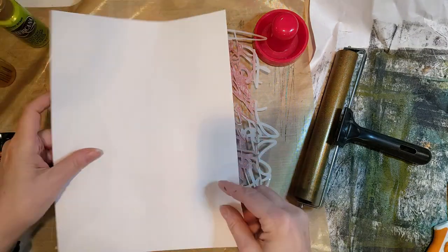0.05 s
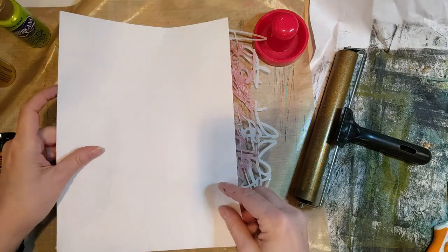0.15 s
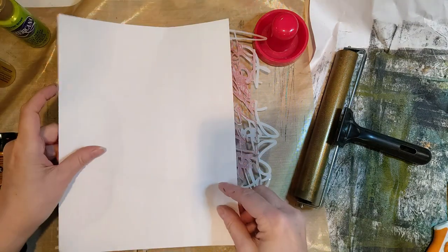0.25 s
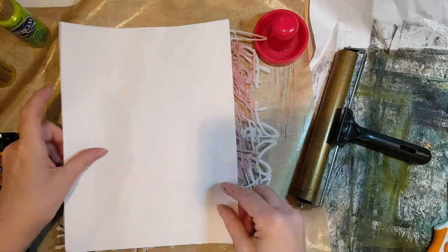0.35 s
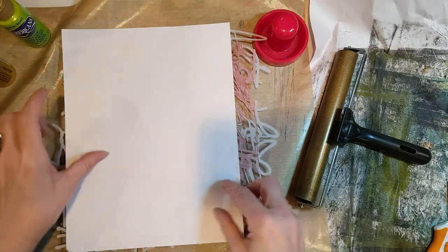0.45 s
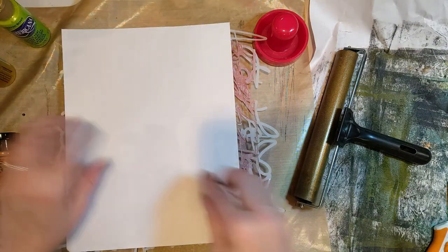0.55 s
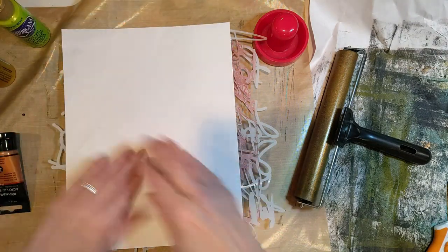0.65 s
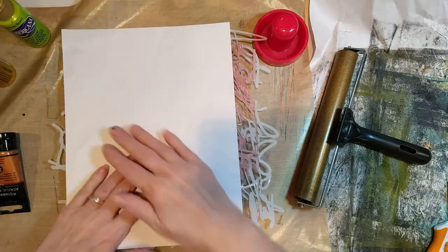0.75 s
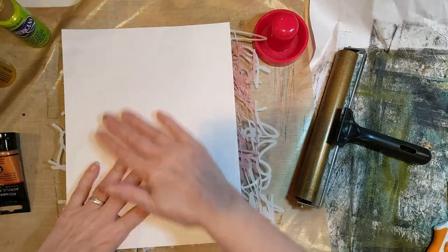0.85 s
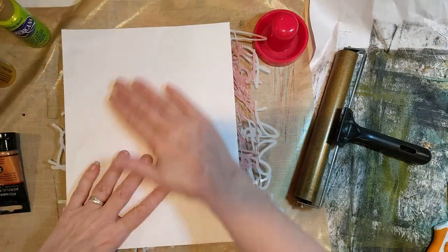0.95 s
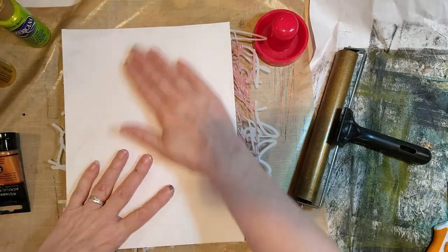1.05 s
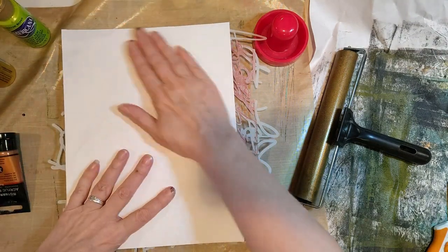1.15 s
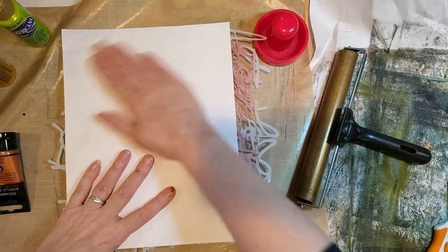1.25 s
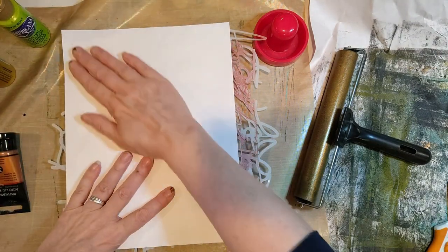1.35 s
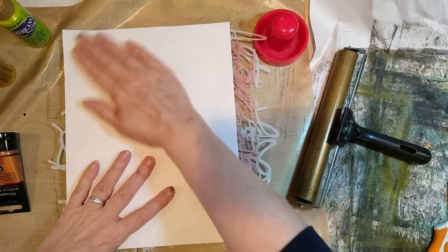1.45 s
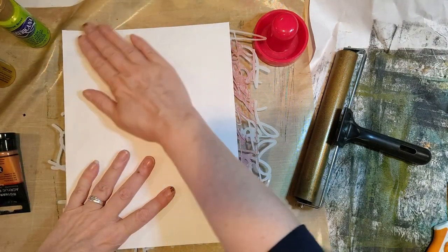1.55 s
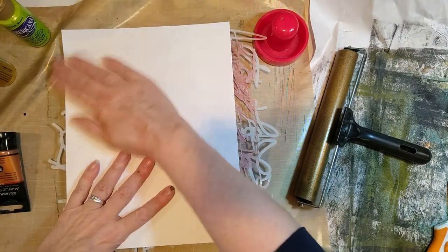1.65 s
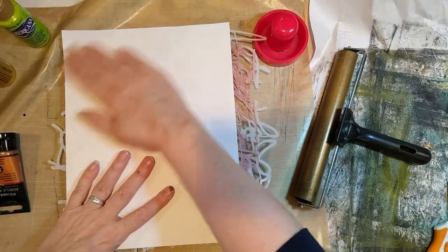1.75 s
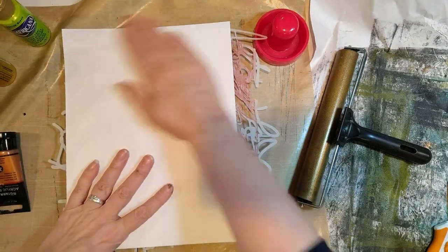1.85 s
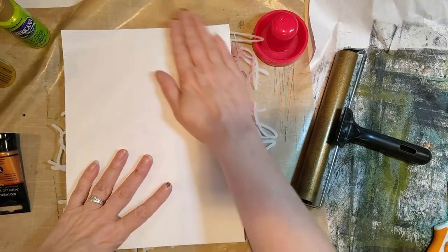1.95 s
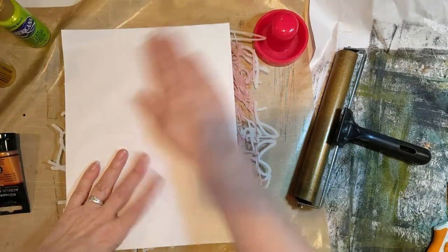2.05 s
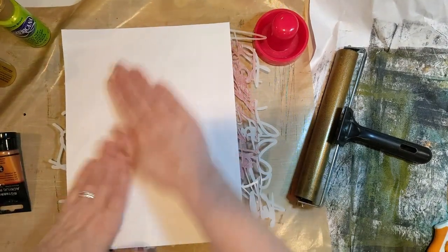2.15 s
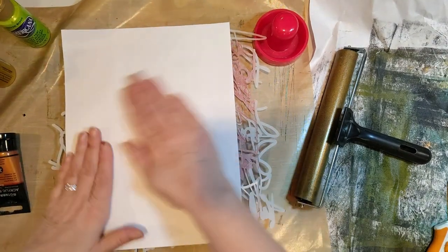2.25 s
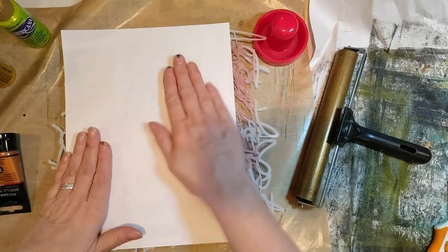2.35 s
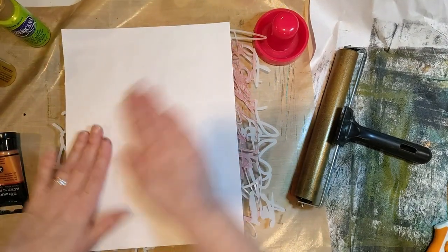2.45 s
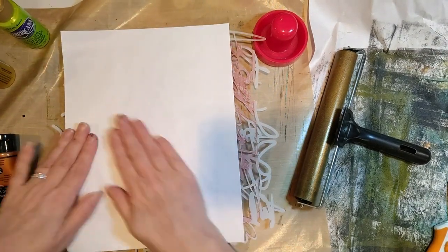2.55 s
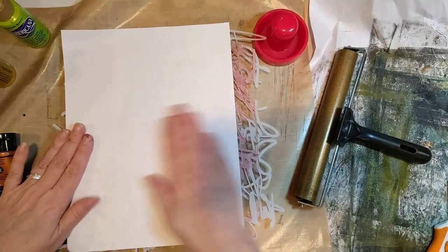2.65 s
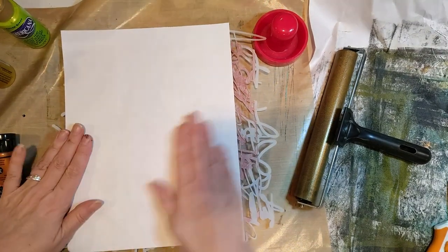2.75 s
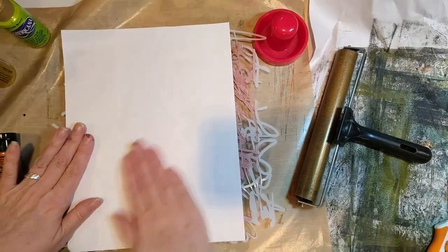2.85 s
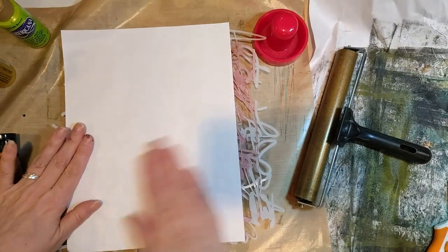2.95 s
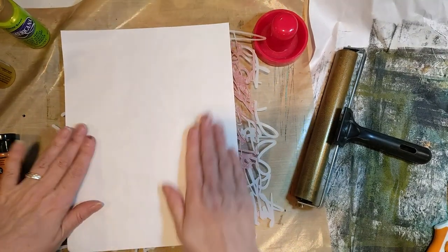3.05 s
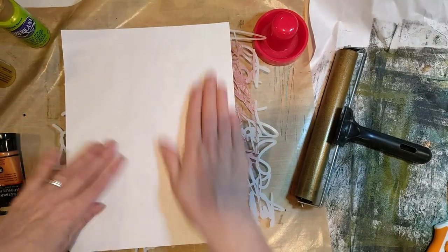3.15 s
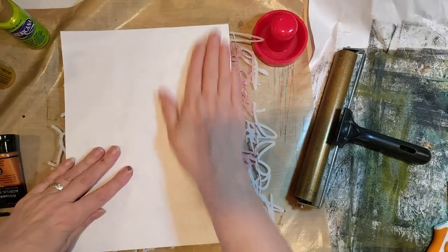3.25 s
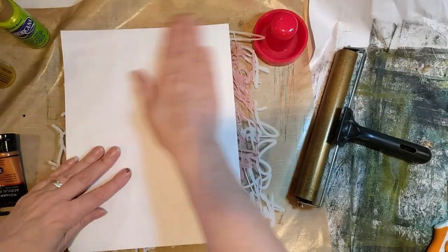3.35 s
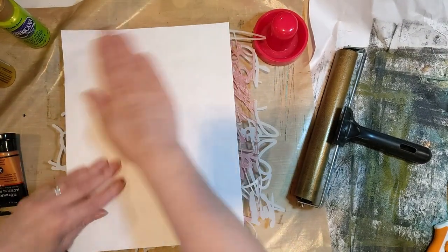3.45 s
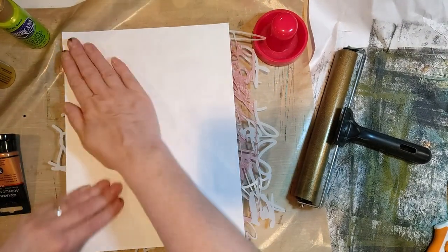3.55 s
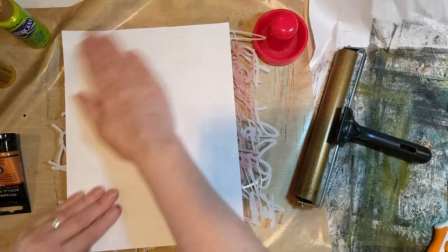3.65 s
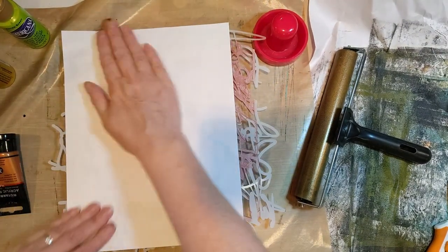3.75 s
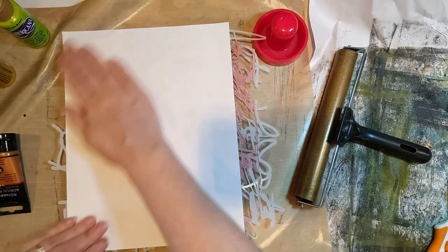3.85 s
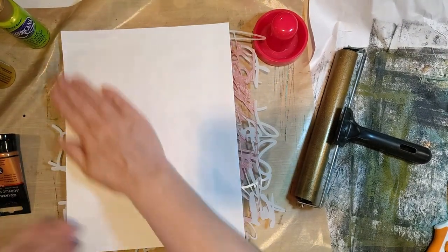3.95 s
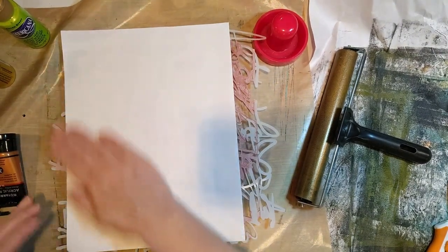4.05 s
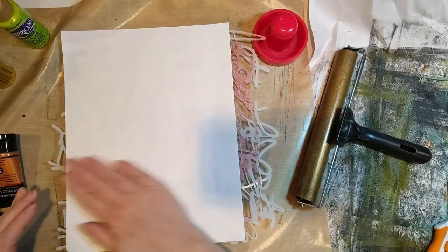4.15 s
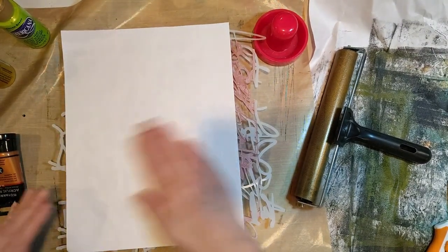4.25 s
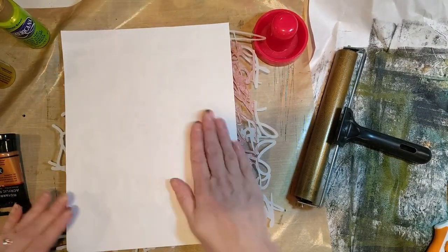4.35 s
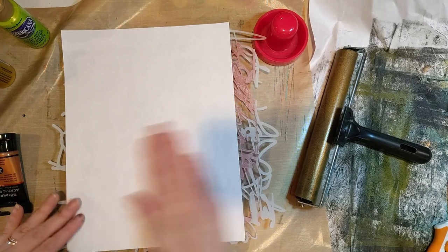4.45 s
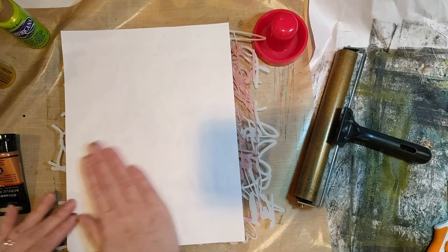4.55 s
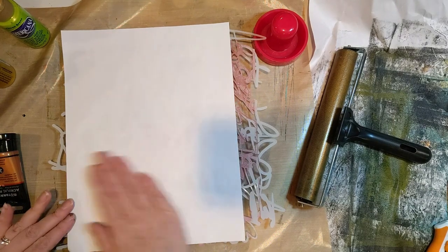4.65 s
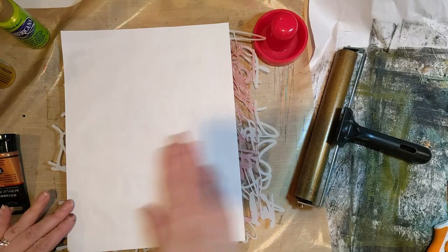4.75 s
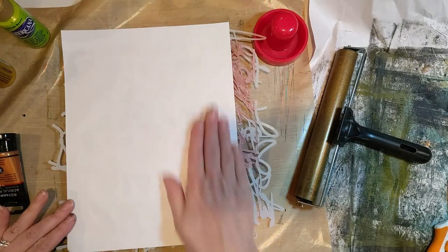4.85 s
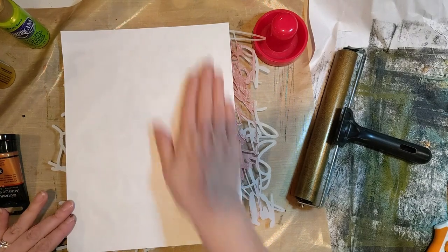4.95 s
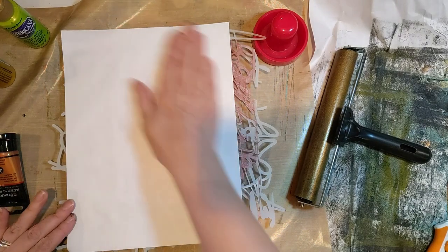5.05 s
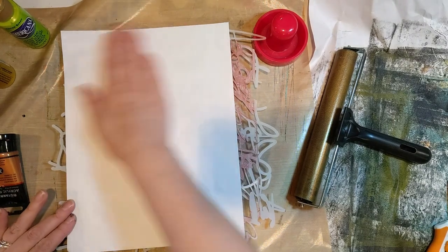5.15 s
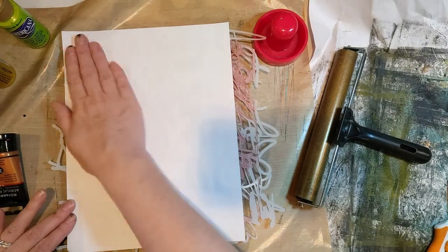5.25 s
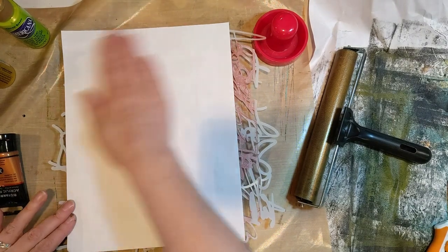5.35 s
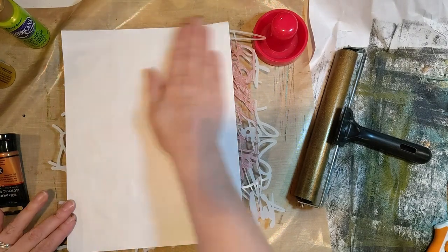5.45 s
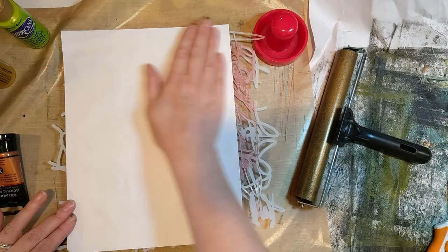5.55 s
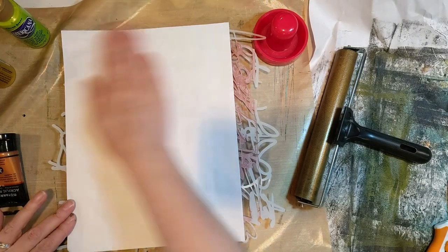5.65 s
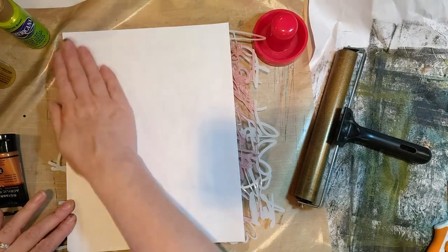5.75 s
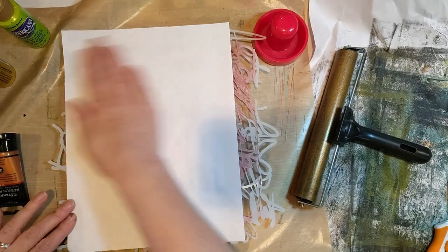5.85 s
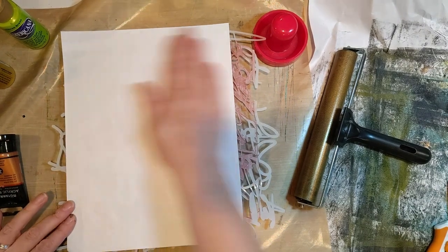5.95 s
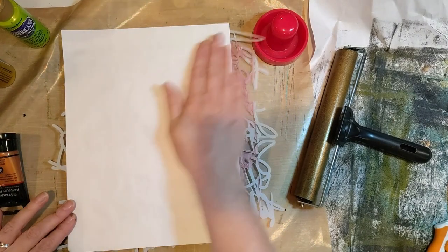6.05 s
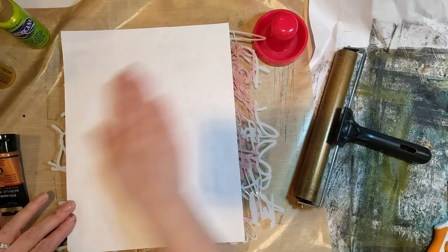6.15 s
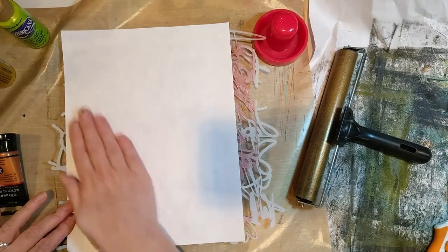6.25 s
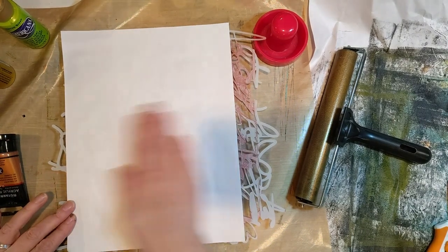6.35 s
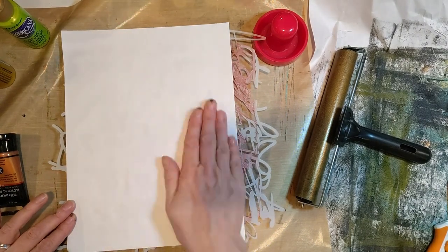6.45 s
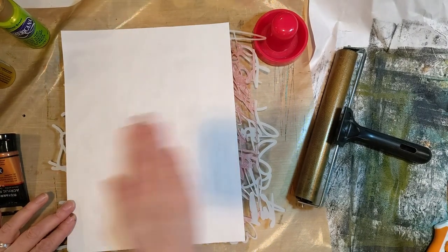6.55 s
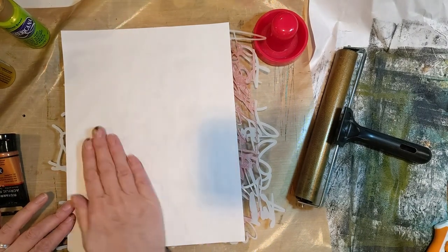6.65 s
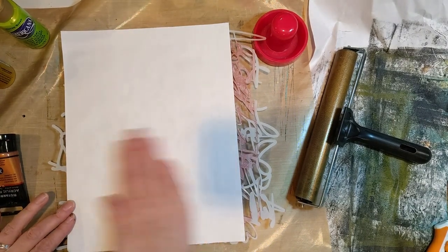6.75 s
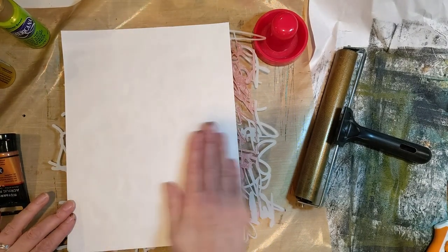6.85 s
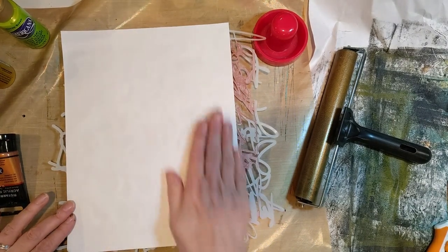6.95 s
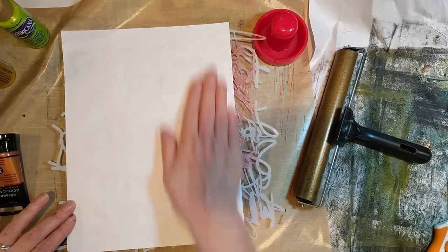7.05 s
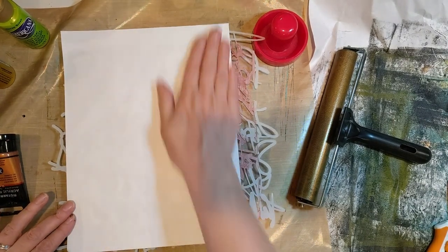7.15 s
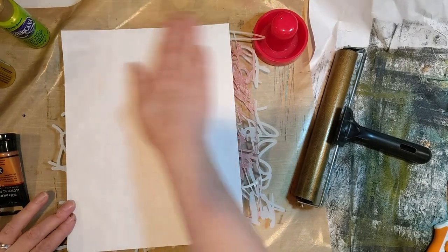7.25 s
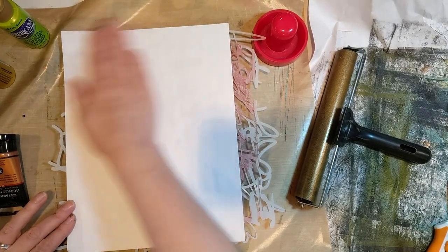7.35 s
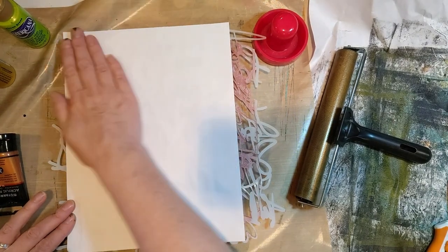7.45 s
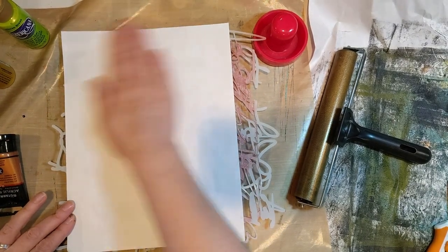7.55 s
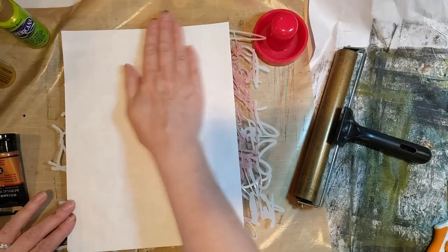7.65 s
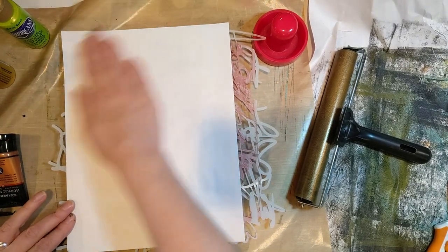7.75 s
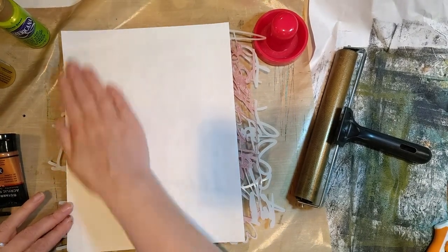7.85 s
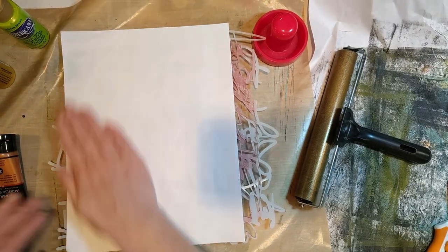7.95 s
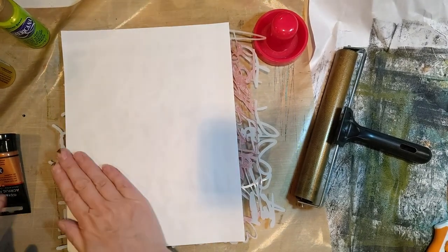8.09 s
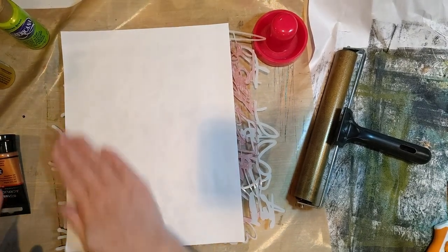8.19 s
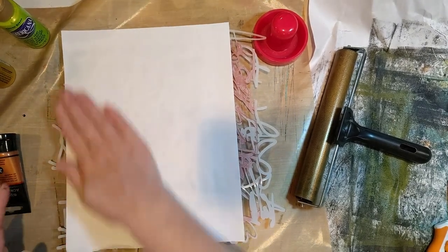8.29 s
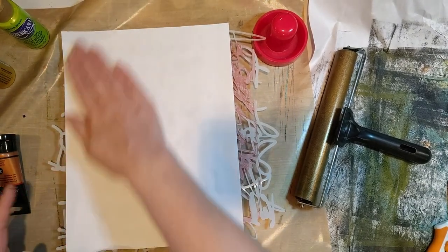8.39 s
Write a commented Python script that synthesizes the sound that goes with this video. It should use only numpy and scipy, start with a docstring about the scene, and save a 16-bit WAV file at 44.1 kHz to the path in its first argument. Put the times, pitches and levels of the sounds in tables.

```python
"""Paper smoothed by hand on a craft table

A loose sheet is slid into place, buckles and is let go; then a palm rubs it flat, back and forth.
Friction is a dense train of random slips: it hisses, rasps, scuffs and rumbles as each stroke gains and loses speed.
Buckles, edge snaps, the tap of the landing hand and jolts set damped modes of the sheet and the table ringing.
Two microphone ports of unlike colour receive the sound in a small room with quiet noise and hum."""
import sys
import numpy as np
from scipy import signal
from scipy.fft import rfft, irfft, next_fast_len
from scipy.io import wavfile

SR = 44100
rng = np.random.default_rng(int(sys.argv[2]) if len(sys.argv) > 2 else 0)


def to_wav(sig):
    """Store sig (one row per channel, or 1-D mono) as 16-bit WAV at the path in sys.argv[1].

    Samples outside -1..1 are clipped; the rate is SR.
    """
    pcm = np.clip(np.atleast_2d(sig), -1, 1) * 32767
    pcm = np.round(pcm).astype(np.int16)
    wavfile.write(sys.argv[1], SR, pcm.T)  # frames by channels


N = 371322
TIME = np.arange(N) / SR
SIZE = next_fast_len(N + SR // 4)  # padded transform length
FREQS = np.maximum(np.arange(SIZE // 2 + 1) * SR / SIZE, 1)
# lower edges of the friction bands
SCUFF_HZ, RASP_HZ, COARSE_HZ, HISS_HZ = 1200, 2300, 3500, 5200
HAND_DOWN_S = 0.78  # the hand lands
SHEET_RESTS_S = 0.61  # the loose sheet lies still from here on

# strokes of the palm: fastest_s, speeding_up_s, slowing_down_s, and relative hiss_db, rasp_db, scuff_db
PALM_STROKES = [(0.787, 0.012, 0.051, -59.5, -86, -82), (0.947, 0.082, 0.37, -53.5, -69, -76.5),
                (1.159, 0.23, 0.25, -44.0, -63.5, -80.5), (1.391, 0.11, 0.15, -42.5, -59.5, -88),
                (1.638, 0.14, 0.046, -48.5, -58, -87), (1.783, 0.109, 0.054, -43.5, -55.5, -85),
                (2.029, 0.24, 0.15, -39.5, -54, -76.5), (2.223, 0.098, 0.13, -39, -55, -73.5),
                (2.414, 0.17, 0.061, -40, -61.5, -74.5), (2.58, 0.13, 0.079, -40.5, -57.5, -76.5),
                (2.766, 0.2, 0.077, -40.5, -60.5, -72), (2.926, 0.13, 0.089, -42, -59, -69),
                (3.104, 0.11, 0.057, -41.5, -58.5, -88), (3.31, 0.37, 0.33, -44, -61, -73),
                (3.59, 0.19, 0.14, -37, -54, -71.5), (3.828, 0.107, 0.071, -45, -54.5, -75.5),
                (3.986, 0.11, 0.1, -42.5, -52, -76.5), (4.213, 0.33, 0.1, -44, -59.5, -80.0),
                (4.418, 0.22, 0.11, -38.5, -59.5, -73.5), (4.615, 0.12, 0.15, -40, -56.5, -69.5),
                (4.9, 0.19, 0.12, -41.5, -60, -75.5), (5.136, 0.31, 0.22, -42.5, -61, -73.5),
                (5.322, 0.2, 0.095, -36, -53.5, -77), (5.585, 0.194, 0.089, -39.5, -52.5, -76.5),
                (5.821, 0.16, 0.12, -37, -50, -73.0), (6.106, 0.21, 0.11, -37.0, -53, -76),
                (6.292, 0.129, 0.16, -39, -53.5, -76), (6.527, 0.175, 0.1, -38.0, -57.5, -76.5),
                (6.706, 0.12, 0.11, -39.5, -57.0, -79.5), (6.964, 0.177, 0.088, -40.5, -58, -71),
                (7.262, 0.31, 0.191, -46.0, -62, -74), (7.514, 0.28, 0.098, -37.0, -53.0, -70.5),
                (7.741, 0.18, 0.059, -40.5, -53.5, -77.5), (7.887, 0.096, 0.11, -40.5, -51.5, -73.5),
                (8.149, 0.49, 0.11, -45.5, -64, -88), (8.388, 0.14, 0.074, -46, -59.5, -70.5)]
# relative hiss_db, rasp_db, scuff_db as the hand turns round, never quite stopping
TURN_DB = (-64, -76, -95)
# the hand brushes past the sheet's edge: peak_s, hiss_db, length_s
EDGE_BRUSHES = [(6.022, -38, 0.027), (8.335, -44, 0.0075), (8.35, -32.5, 0.012)]
# spectrum of skin on paper: frequency_hz, density_db (per Hz)
SKIN_COLOUR = [(2000, -34), (2350, -16), (2750, -12.5), (3400, -11.5), (4400, -11), (5400, -11), (6100, -5),
               (6700, -1.5), (7700, -4.5), (9000, -6), (11000, -6.5), (13600, -7.5), (15700, -13)]
# spectrum of the low dragging sounds: frequency_hz, density_db (per Hz)
LOW_DRAG_COLOUR = [(40, -37), (70, -4), (100, -7.5), (145, -8), (220, -8), (330, -8), (500, -12.5),
                   (800, -26), (1150, -10), (1600, -3.5), (2000, -6.5), (2400, -2)]


def rubbing(hiss_gain_db=0.14, fine_gain_db=-1.5, coarse_gain_db=-7.5, bite=0.13):
    """Stick-slip friction: a faster palm makes louder and denser slips; each turn nearly stops the hiss."""
    hiss_db, rasp_db, scuff_db = stroke_levels(PALM_STROKES, TURN_DB)
    slips_per_s = 32000 * from_db(0.5 * (hiss_db - hiss_db.mean()))
    skin = from_db(over_hz(SKIN_COLOUR))
    drag = from_db(over_hz(LOW_DRAG_COLOUR))

    hiss = friction(skin * above(HISS_HZ), slips_per_s, uneven_db=0.35)
    hiss = from_db(hiss_db + hiss_gain_db) * hiss

    fine_band = above(COARSE_HZ) * below(HISS_HZ)
    fine = from_db(fine_gain_db) * friction(skin * fine_band, slips_per_s / 2, uneven_db=0.37)
    # a heavier hand bites deeper, which brings out the lower part of the rasp
    coarse_db = coarse_gain_db + bite * (scuff_db - scuff_db.mean())
    coarse_band = above(RASP_HZ, order=4) * below(COARSE_HZ)
    coarse = from_db(coarse_db) * friction(skin * coarse_band, slips_per_s / 2, uneven_db=1.0)
    rasp = from_db(rasp_db) * (fine + shifting(coarse, depth_db=4.5))

    scuff_band = above(SCUFF_HZ) * below(RASP_HZ)
    scuff = from_db(scuff_db) * friction(drag * scuff_band, 1800, uneven_db=1.0)
    rumble = from_db(rumble_level()) * friction(drag * below(SCUFF_HZ), 2500, uneven_db=1.5)

    brush = swells(EDGE_BRUSHES) * friction(skin * above(RASP_HZ), 6800, uneven_db=3.5)
    brush = brush * from_db([[1.5], [-2.5]])  # left, right
    palm = shifting(hiss + rasp, depth_db=2.5) + shifting(scuff + rumble, depth_db=9.0)
    return palm * hand_down() + brush


# exponents of speed in the amplitude of the treble, middle and low parts of a stroke [no unit]
FRICTION_EXPONENTS = (2.09, 1.36, 0.98)


def stroke_levels(rows, rest_db):
    """Speed-dependent friction: speed follows a cosine, and each band's amplitude is a power of it."""
    s, rise, fall, *peaks_db = np.transpose(rows)[..., None]
    ticks = TIME[::32]
    progress = (ticks - s) / np.maximum(np.where(ticks < s, rise, fall), 1e-3)
    speed = np.cos(np.pi / 2 * np.clip(progress, -1, 1))
    levels = []
    for db, exponent, rest in zip(peaks_db, FRICTION_EXPONENTS, rest_db):
        power = np.sum((from_db(db) * speed ** exponent) ** 2, axis=0) + from_db(rest) ** 2
        levels.append(np.interp(TIME, ticks, 10 * np.log10(power + 1e-20)))
    return levels


# the table's rumble, which grows as the hand leans on it: time_s, level_db
TABLE_RUMBLE = [(0.78, -82), (1.1, -88), (1.85, -87), (2.15, -76), (2.45, -79.5), (2.62, -71.5),
                (2.85, -87), (3.6, -87.5), (4.4, -89.5), (5.35, -77.5), (5.65, -83), (6.1, -81), (6.4, -92),
                (7.3, -88), (7.6, -78), (8.1, -93), (8.42, -72)]


def rumble_level():
    """Load-dependent friction: the rumble level in dB, interpolated in time."""
    s, db = np.transpose(TABLE_RUMBLE)
    return np.interp(TIME, s, db)


def hand_down(fade_s=0.0036):
    """Contact onset: a short ramp from zero to one as the hand lands."""
    return np.clip((TIME - HAND_DOWN_S) / fade_s + 1, 0, 1)


# pushes of the loose sheet: fastest_s, speeding_up_s, slowing_down_s, and relative hiss_db, rasp_db, flutter_db
SHEET_PUSHES = [(0.005, .03, 0.04, -49.5, -60, -61.5), (0.095, .11, 0.075, -48, -56.5, -61),
                (0.205, 0.16, 0.084, -46, -56.5, -57), (0.33, .1, 0.15, -54, -52.5, -63),
                (0.44, 0.08, 0.09, -50.5, -52, -75.5), (0.525, 0.089, 0.049, -41.5, -57, -58.5),
                (0.565, 0.019, 0.064, -63, -70, -69)]
# spectrum of the sliding sheet: frequency_hz, density_db (per Hz)
SLIDING_COLOUR = [(150, -43), (250, -13.5), (798, -8.5), (870, -7), (1030, -4.5), (1680, -3.5),
                  (2380, -10.5), (4510, -8), (5360, -14), (6840, -9.5), (8130, -17), (10200, -18),
                  (15700, -28.5)]


def sliding(settle_s=0.013):
    """Sliding friction of a free sheet: undamped by the hand, it sounds fuller."""
    hiss_db, rasp_db, flutter_db = stroke_levels(SHEET_PUSHES, [-np.inf] * 3)
    colour = from_db(over_hz(SLIDING_COLOUR))
    rasp_band = above(RASP_HZ) * below(HISS_HZ)
    hiss = from_db(hiss_db) * friction(colour * above(HISS_HZ), 8000, uneven_db=0.7)
    rasp = from_db(rasp_db) * friction(colour * rasp_band, 6000, uneven_db=1.1)
    flutter = from_db(flutter_db) * friction(colour * below(RASP_HZ), 6000, uneven_db=0.8)
    moving = np.clip((SHEET_RESTS_S - TIME) / settle_s, 0, 1)
    balance = from_db([[0.8], [-2.6]])  # left, right
    return shifting(hiss + rasp + flutter, depth_db=3.5) * moving * balance


# the bowed sheet buckles: start_s, force_db, rattle_t60_s
SHEET_BUCKLES = [(0.1365, -28.5, 0.026), (0.209, -31, 0.1), (0.229, -34.5, 0.073), (0.517, -39.5, 0.073)]
# modes of the buckling sheet: pitch_hz, relative level_db, t60_s
BUCKLING_MODES = [(267, -27, 0.066), (404, -46, .06), (648, -14, 0.073), (696, -6.5, 0.03),
                  (819, -9, 0.093), (900, -12.5, 0.073), (1020, -8, 0.09), (1213, -3.5, 0.071),
                  (1240, -4, 0.06), (1430, -3, 0.067), (1840, -3.5, 0.045), (2130, 0.5, 0.021),
                  (2400, -5, 0.019), (2485, -11, 0.063), (2880, -5, 0.019)]


def buckling(pop_db=2.5, modes_db=-8.5, scatter_db=-23):
    """Snap-through buckling: the sheet pops and rattles in its modes; so thin, it radiates little bass."""
    force = sum(from_db(db) * blow(s, scatter_db, t60) for s, db, t60 in SHEET_BUCKLES)
    pop = from_db(pop_db) * ring(force, 870, 0.0012)
    rattle = from_db(modes_db) * ringing(force, BUCKLING_MODES)
    bass_cut = signal.butter(2, 330, "high", fs=SR, output="sos")
    return from_left(signal.sosfilt(bass_cut, pop + rattle), shade_db=0.5)


# the sheet's edge snaps; the faint one at 0.784 s is the tap of the hand landing:
# start_s, force_db, low_modes_db (extra force on the low modes)
SNAPS_AND_TAP = [(0.5167, -22, 9.5), (0.521, -16, 0), (0.542, -19, 1.5), (0.784, -39, -21),
                 (5.796, -33.5, 19), (6.0004, -7.5, -7), (6.003, 5.5, -2.5), (8.3495, -9, -23),
                 (8.352, -17.5, 4)]
# modes of the snapping edge: pitch_hz, relative level_db, t60_s
SNAPPING_MODES = [(2420, -23.5, 0.0057), (2715, -23, 0.016), (3140, -21.5, 0.005), (4420, -13.5, 0.0021),
                  (5970, -6.5, 0.0012), (7250, -5.5, 0.0027), (7740, -7, 0.002), (9020, -8.5, 0.0022),
                  (12800, -16.5, 0.0012)]


def snapping(scatter_db=-26.5, tail_t60_s=0.074):
    """Elastic release: the edge flicks free with a crack, scattered by the table top; the hand's tap rings alike."""
    forces = [from_db(db) * blow(s, scatter_db, tail_t60_s) for s, db, _ in SNAPS_AND_TAP]
    deep = sum(force * from_db(low_db) for force, (_, _, low_db) in zip(forces, SNAPS_AND_TAP))
    crack = ringing(sum(forces), [mode for mode in SNAPPING_MODES if mode[0] > HISS_HZ])
    body = ringing(deep, [mode for mode in SNAPPING_MODES if mode[0] <= HISS_HZ])
    bass_cut = signal.butter(4, 1700, "high", fs=SR, output="sos")
    return from_left(signal.sosfilt(bass_cut, crack + body), shade_db=0.0)


# the hand catches and jolts the sheet: peak_s, relative thud_db, relative crinkle_db, length_s
HAND_JOLTS = [(1.978, -68.5, -61, 0.017), (2.16, -79, -64, 0.025), (2.582, -89, -81, .06),
              (2.694, -61.5, -78, 0.011), (2.907, -74, -72, 0.014), (3.405, -72.5, -70, 0.016),
              (3.595, -72, -62.5, 0.021), (3.981, -68, -69, 0.02), (4.049, -70, -71, 0.031),
              (4.532, -93, -64, .007), (5.311, -76, -66.5, 0.026), (5.624, -78, -68.5, 0.012),
              (5.794, -69.5, -72, 0.017), (6.004, -55.5, -79, 0.0075), (6.152, -71, -54.5, 0.016),
              (6.191, -77, -62, 0.0062), (6.222, -73.5, -60.5, 0.011), (7.01, -85, -64, 0.017),
              (7.468, -64.5, -62, 0.016), (7.533, -67, -67, 0.016), (7.679, -65.5, -71, 0.015),
              (8.345, -62, -47, 0.012)]
# modes of the covered table: pitch_hz, relative level_db, t60_s
COVERED_TABLE_MODES = [(75.4, -16.5, 0.13), (142, -9, 0.094), (250, -3.5, 0.042), (307, -4, 0.067),
                       (445, -5, 0.066), (629, -3.5, 0.063), (781, -1.5, 0.066), (872, 1, 0.033),
                       (1079, -2.5, 0.064)]
# modes of the sheet crinkling under the hand: pitch_hz, relative level_db, t60_s
CRINKLING_MODES = [(1160, -20, 0.032), (1452, -4.5, 0.036), (1693, -6.5, 0.057), (1930, -2.5, 0.013),
                   (2320, -4, 0.023)]


def jolting(thud_db=-32.0, crinkle_db=-26.5):
    """Modal excitation: a soft knock and an uneven shudder thud in the table; the shudder crinkles the sheet."""
    shudder = friction(below(3900), 2200, uneven_db=1.0)
    knocks = bumps()
    for s, db, _, _ in HAND_JOLTS:
        knocks[round(s * SR)] = from_db(db)
    thud_swell = swells([(s, db, length) for s, db, _, length in HAND_JOLTS])
    crinkle_swell = swells([(s, db, length) for s, _, db, length in HAND_JOLTS])
    thud = ringing(knocks + from_db(thud_db) * shudder * thud_swell, COVERED_TABLE_MODES)
    crinkle = ringing(from_db(crinkle_db) * shudder * crinkle_swell, CRINKLING_MODES)
    return from_left(thud, shade_db=-2.5) + crinkle


def bumps(per_s=7, over_rumble_db=-3, spread_db=3):
    """Random impacts: the fingers knock lightly by chance, harder when the hand leans on the table."""
    sizes = from_db(rumble_level() + over_rumble_db + spread_db * rng.standard_normal(N))
    return sizes * (rng.random(N) < per_s / SR) * hand_down()


def friction(gain, slips_per_s, uneven_db):
    """Stick-slip noise: countless tiny slips over paper fibres, their level wavering with the grip."""
    chance = np.clip(slips_per_s / SR, 1e-3, 1)
    happens = rng.random((2, N)) < chance
    slips = happens * rng.standard_normal((2, N)) / np.sqrt(chance)  # equal power at any density
    return at_ports(slips, gain) * from_db(uneven_db * drift(21))


def shifting(x, depth_db, width_hz=130, hold_s=0.046):
    """Random spectral gain: narrow patches of the sound swell and fade by chance; their height is capped."""
    hz, s, frames = signal.stft(x, SR, nperseg=1024)
    patches = rng.standard_normal(frames.shape[1:])
    # smooth the chance along frequency, then along time
    for axis, span in enumerate([width_hz / hz[1], hold_s / s[1]]):
        keep = np.exp(-2 / span)
        patches = signal.filtfilt([1 - keep], [1, -keep], patches, axis=axis, padtype="even")
    gains = rms_one(from_db(depth_db * np.minimum(rms_one(patches), 1)))
    return signal.istft(frames * gains, SR)[1][:, :N]


def swells(rows):
    """Transient envelopes: Gaussian rise and exponential fall, from rows of peak_s, level_db, length_s."""
    total = 0
    for s, db, length in rows:
        age = (TIME - s) / length
        total = total + from_db(db) * np.exp(-np.minimum(np.where(age < 0, age ** 2, age), 50))
    return total


def blow(s, scatter_db, t60):
    """Impulsive force: a unit click at both ports; dying scatter follows a millisecond later."""
    force, start = np.zeros((2, N)), round(s * SR)
    age = TIME[:min(SR // 4, N - start)]
    scatter = from_db(scatter_db - 60 * age / t60) * rng.standard_normal((2, len(age)))
    force[:, start:start + len(age)] = scatter * (age > 0.001)
    force[:, start] = 1
    return force


def ring(force, hz, t60):
    """Damped resonance: a unit click sets a decaying sine of height 1 ringing."""
    radius = from_db(-60 / (t60 * SR))
    w = 2 * np.pi * hz / SR
    return signal.lfilter([0, np.sin(w)], [1, -2 * radius * np.cos(w), radius ** 2], force + 1e-18)


def ringing(force, modes):
    """Modal superposition: a force sets all the modes of a body ringing, with alternating signs."""
    return sum(from_db(db) * ring(force, hz, t60) * (-1) ** k for k, (hz, db, t60) in enumerate(modes))


def from_left(pair, shade_db, lag_s=0.00026):
    """Propagation delay: a sound on the left reaches the right port later, its level changed by shade_db."""
    return np.array([pair[0], from_db(shade_db) * np.roll(pair[1], round(lag_s * SR))])


# likeness of the two ports: frequency_hz, correlation (no unit)
PORT_LIKENESS = [(60, 0.52), (130, 0.27), (600, 0.091), (1400, 0.076), (3000, 0.01)]


def at_ports(pair, gain):
    """Spatial coherence: two unrelated signals are coloured and mixed, more alike in the long waves. Unit power."""
    alike = np.clip(over_hz(PORT_LIKENESS), -1, 1)
    mid, side = shaped(pair, gain * np.sqrt([1 + alike, 1 - alike]))
    return rms_one(np.array([mid + side, mid - side]))


def from_db(db):
    """Logarithmic level: decibels to amplitude gain."""
    return 10 ** (np.asarray(db) / 20)


def rms_one(x):
    """Power normalisation: scale to unit mean square."""
    return x / np.sqrt(np.mean(x ** 2) + 1e-20)


def over_hz(points):
    """Logarithmic frequency scale: read a table between its points along it."""
    hz, value = np.transpose(points)
    return np.interp(np.log(FREQS), np.log(hz), value)


def shaped(x, gain):
    """Linear filtering: multiply the spectrum by a gain per frequency."""
    return irfft(rfft(x, SIZE) * gain, SIZE)[..., :N]


def below(hz, order=8):
    """Butterworth low-pass magnitude."""
    return 1 / np.sqrt(1 + (FREQS / hz) ** (2 * order))


def above(hz, order=8):
    """Butterworth high-pass magnitude, the complement in power of below."""
    return 1 / np.sqrt(1 + (hz / FREQS) ** (2 * order))


def drift(rate_hz):
    """Band-limited chance: slow noise with spread 1."""
    return rms_one(shaped(rng.standard_normal(N), below(rate_hz, order=2)))


def room(x, wet_db=-18.0, t60=0.09):
    """Diffuse reverberation: brief decaying reflections, different at each port."""
    age = TIME[:SR // 3]
    tail = rng.standard_normal((2, len(age))) * from_db(-60 * age / t60) * (age > 0.004)
    tail /= np.sqrt(np.sum(tail ** 2, axis=1, keepdims=True))  # unit energy at each port
    return x + from_db(wet_db) * signal.fftconvolve(x, tail, axes=1)[:, :N]


# spectrum of the room noise: frequency_hz, density_db (per Hz)
AIR_COLOUR = [(20, -5), (35, -30), (48, 0.5), (65, 3.5), (90, -4.5), (140, 1.5), (220, -3.5), (450, -8),
              (2200, -8.5), (6000, -6.5), (15700, -14)]


def background(air_db=-72.5, hum_db=-90.0):
    """Stationary noise floor: coloured room noise and a 60 Hz trace of mains hum."""
    air = from_db(air_db) * at_ports(rng.standard_normal((2, N)), from_db(over_hz(AIR_COLOUR)))
    return air + from_db(hum_db) * np.sin(2 * np.pi * 60 * TIME)


# colour difference of the ports: frequency_hz, left_minus_right_db
PORT_COLOURS = [(200, -1.5), (1300, 1.5), (2400, 3.5), (4400, 5.5), (5500, 9.5), (6500, 12), (8000, 5.5),
                (9300, 0), (11500, -6), (13500, -1.5), (15700, -11)]


def scene():
    """Superposition: paper sounds take each port's colour, and the background lies under them."""
    paper = rubbing() + sliding() + room(buckling() + snapping() + jolting())
    lean = from_db(over_hz(PORT_COLOURS)) ** 2  # power ratio, left to right
    port_powers = 2 * np.array([lean, np.ones_like(lean)]) / (1 + lean)
    return shaped(paper, np.sqrt(port_powers)) + background()


def record(dry, cutoff_hz=15900):
    """Band limiting: peaks are clipped at full scale, then the top is cut steeply."""
    return shaped(np.clip(dry, -1, 1), below(cutoff_hz, order=150))


dry = scene()
out = record(dry)
to_wav(out)
```